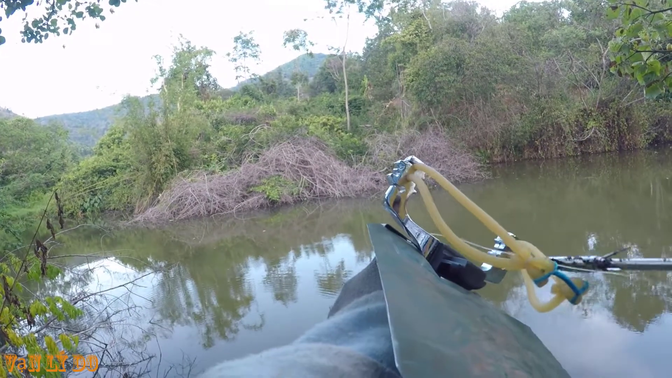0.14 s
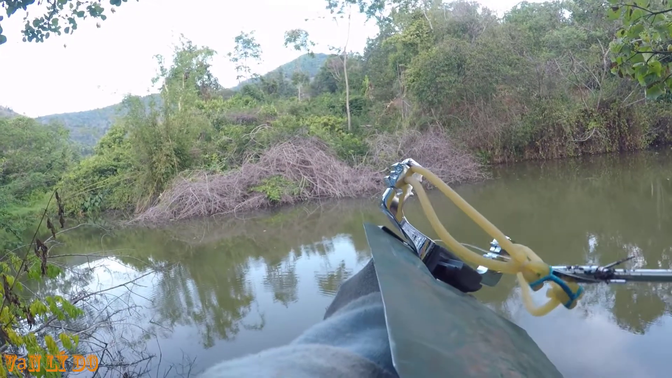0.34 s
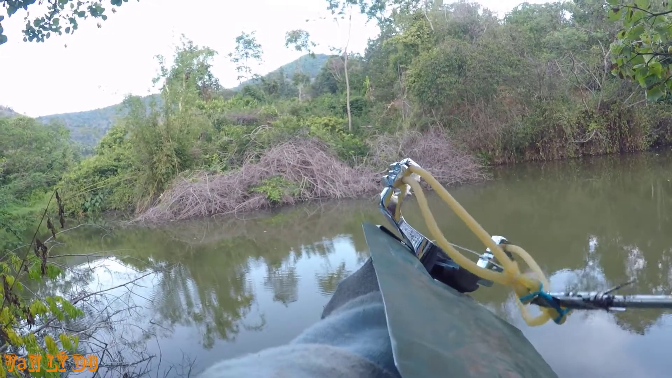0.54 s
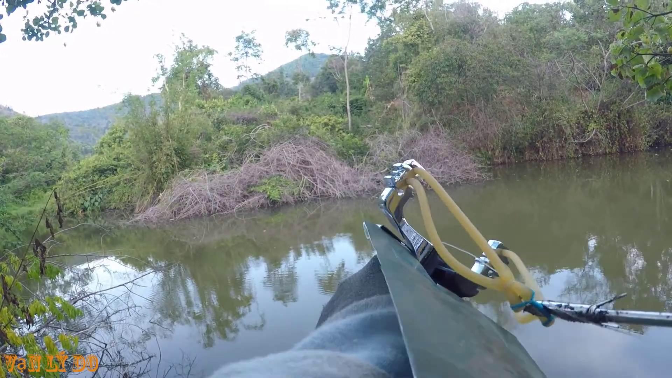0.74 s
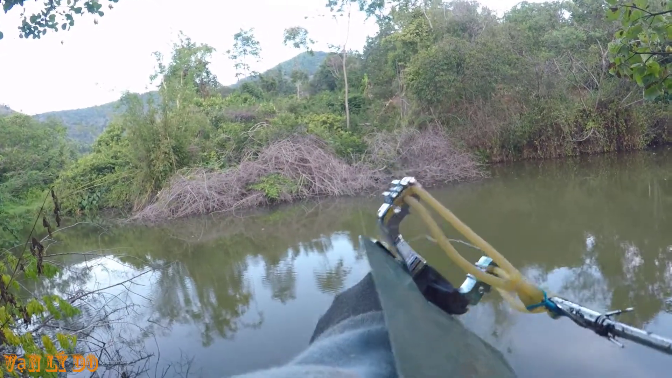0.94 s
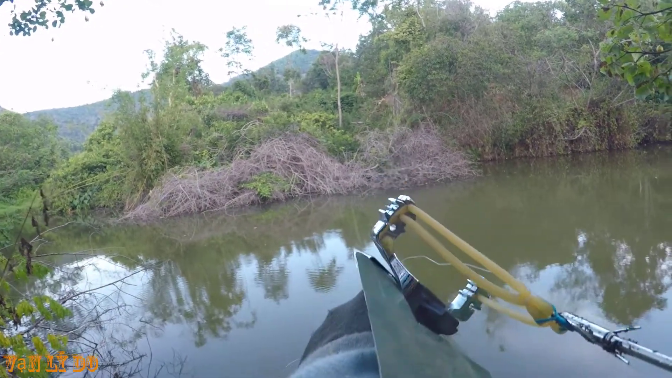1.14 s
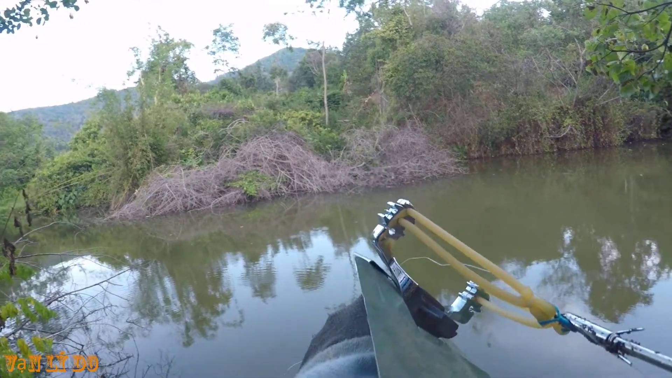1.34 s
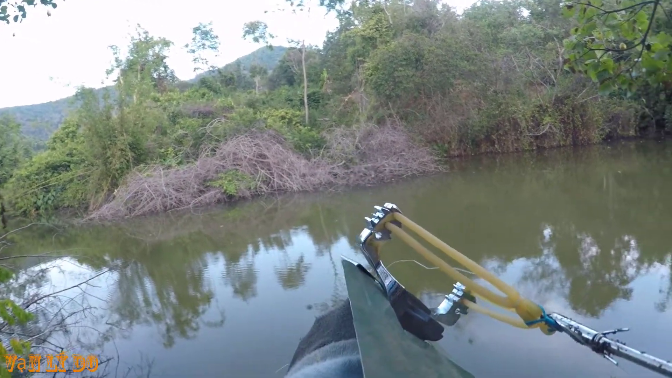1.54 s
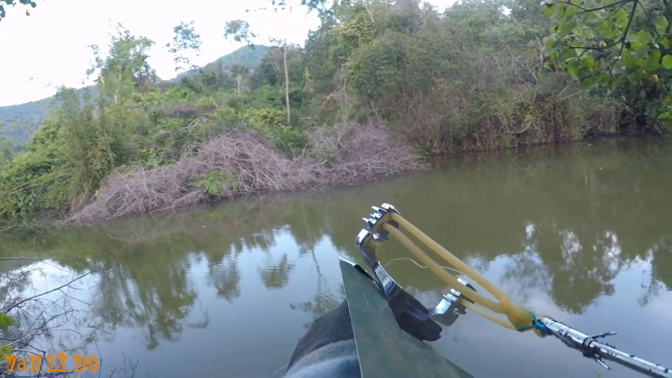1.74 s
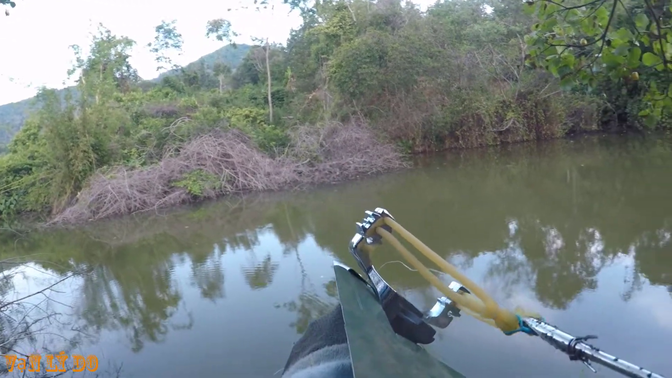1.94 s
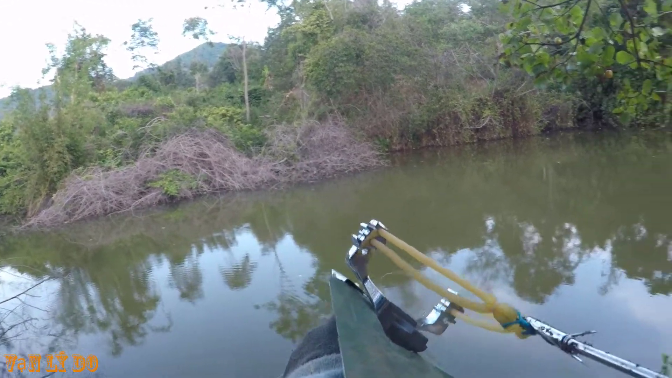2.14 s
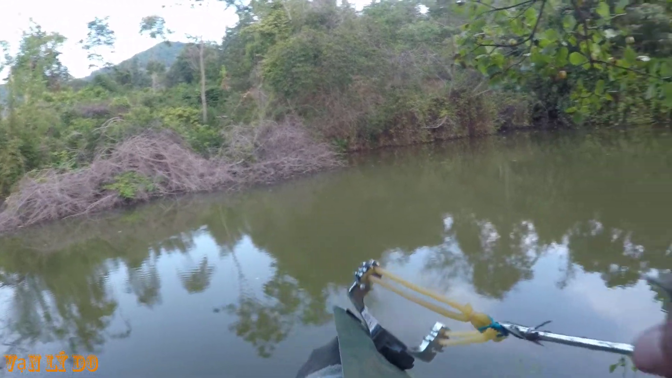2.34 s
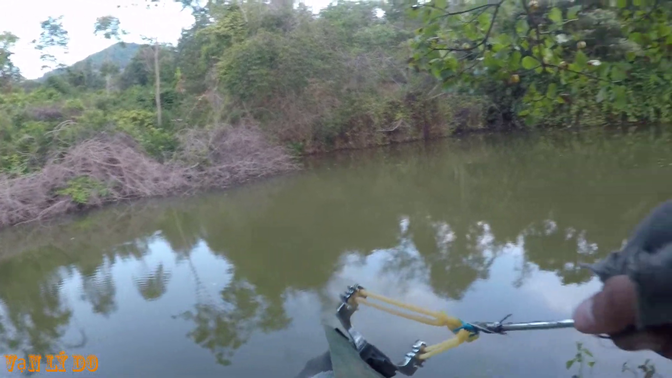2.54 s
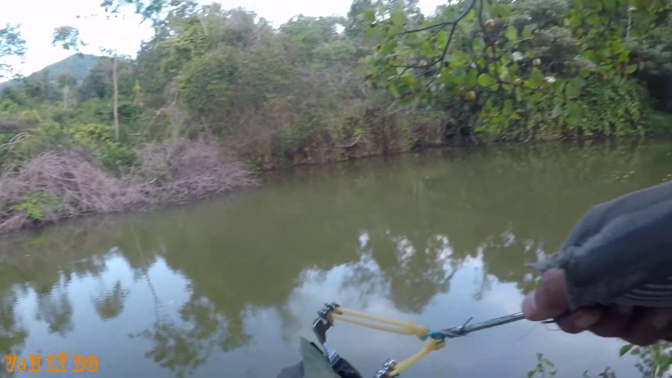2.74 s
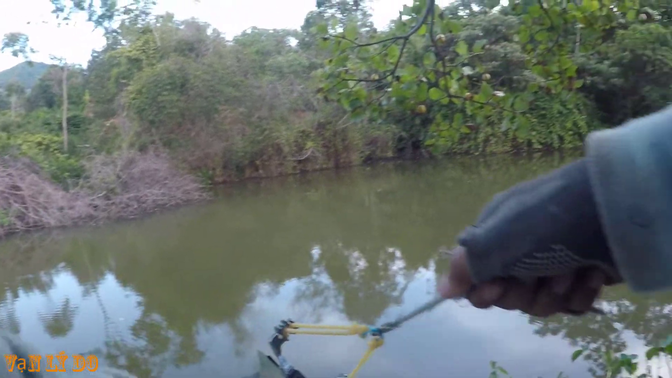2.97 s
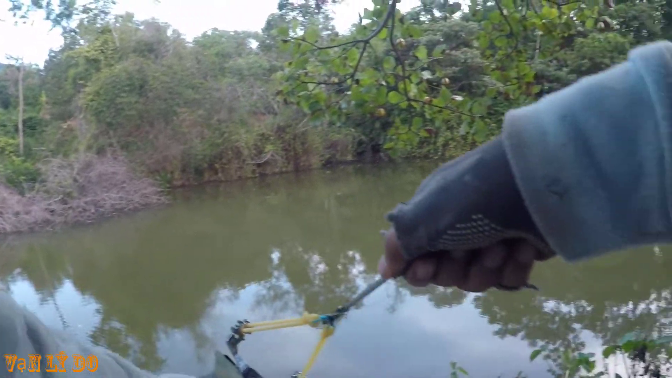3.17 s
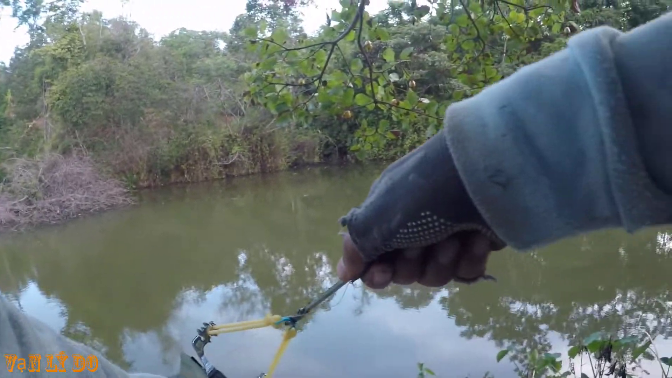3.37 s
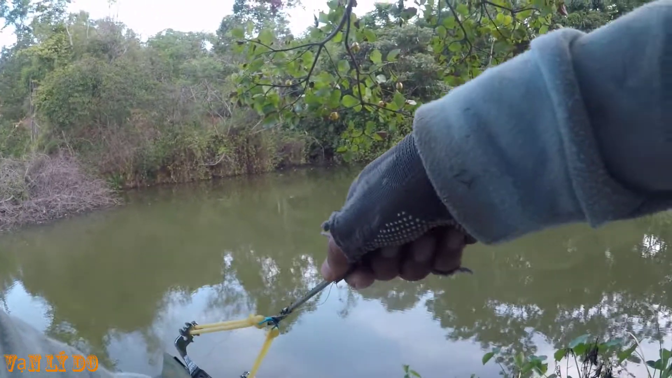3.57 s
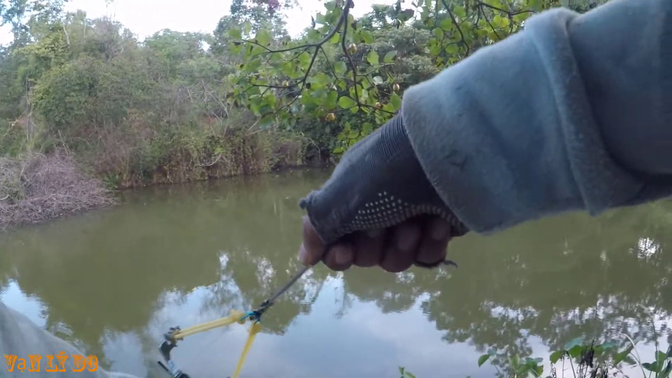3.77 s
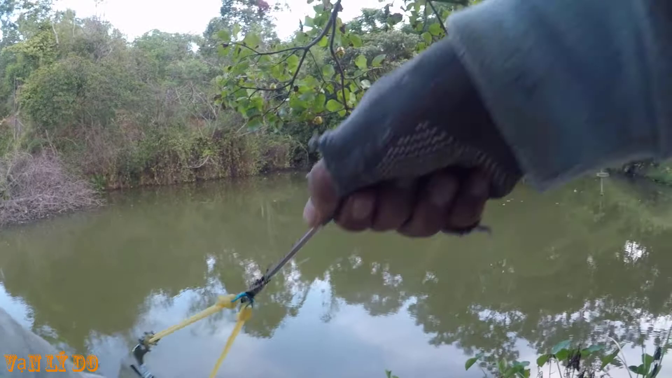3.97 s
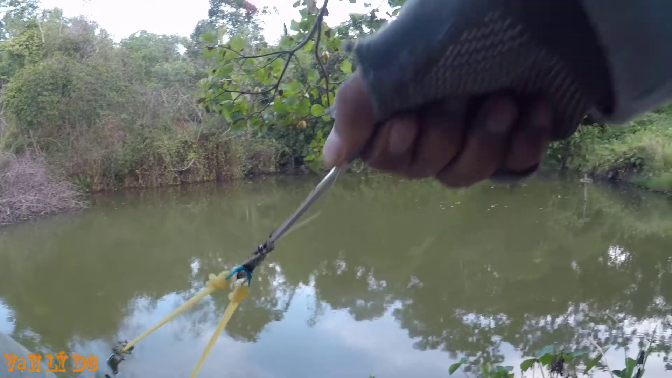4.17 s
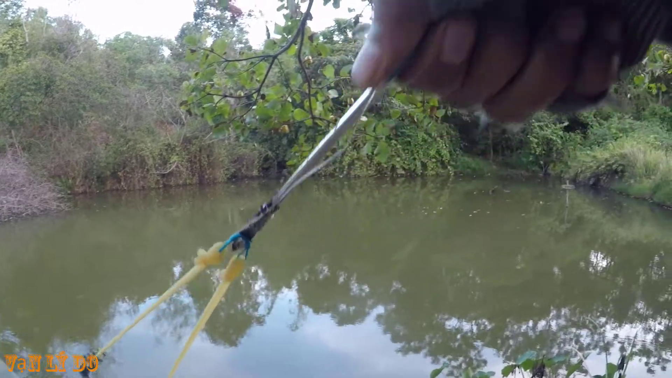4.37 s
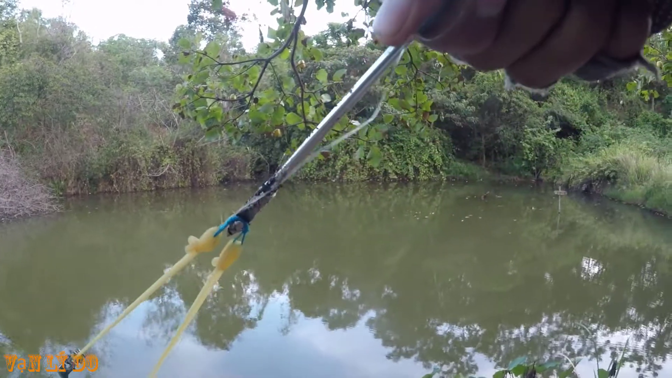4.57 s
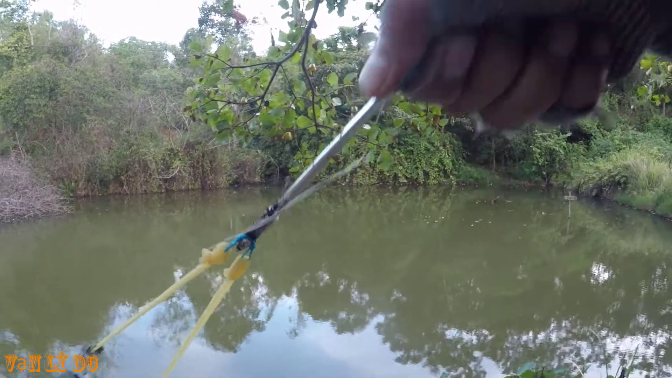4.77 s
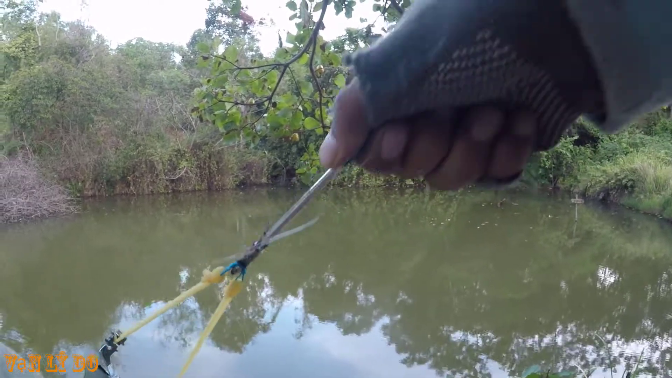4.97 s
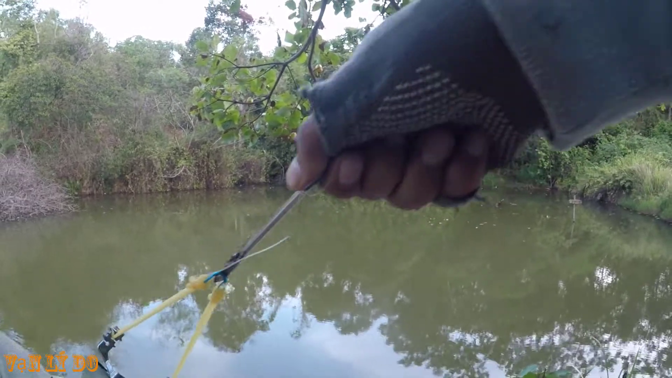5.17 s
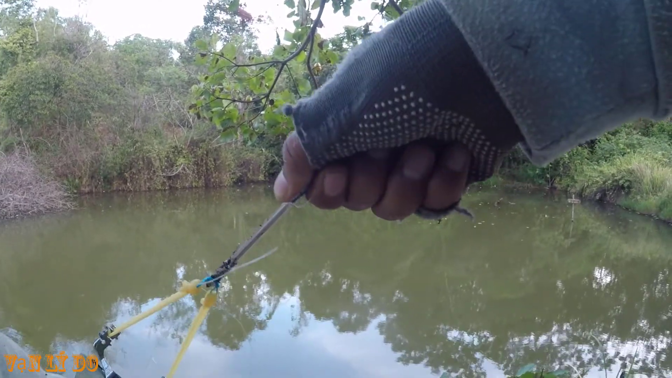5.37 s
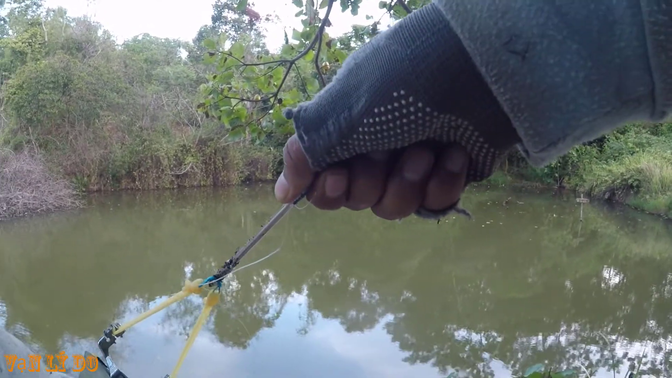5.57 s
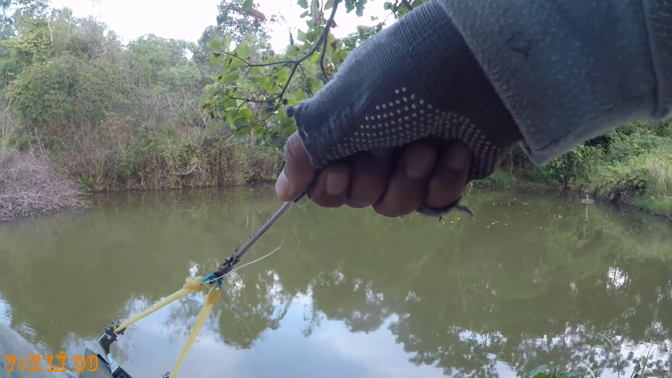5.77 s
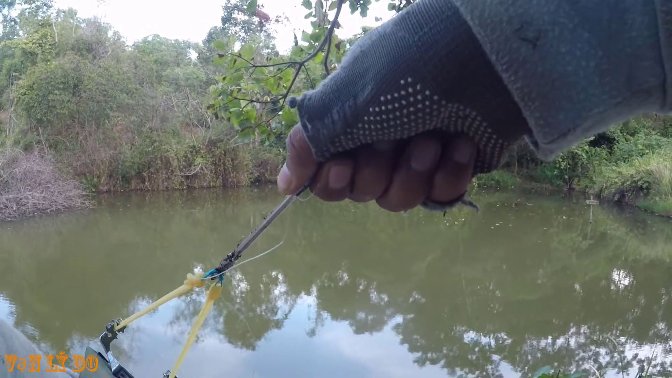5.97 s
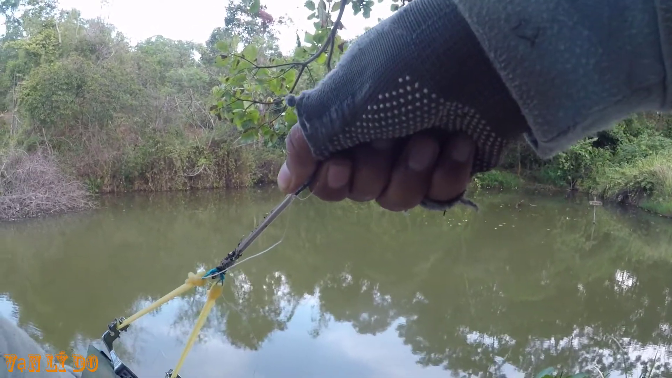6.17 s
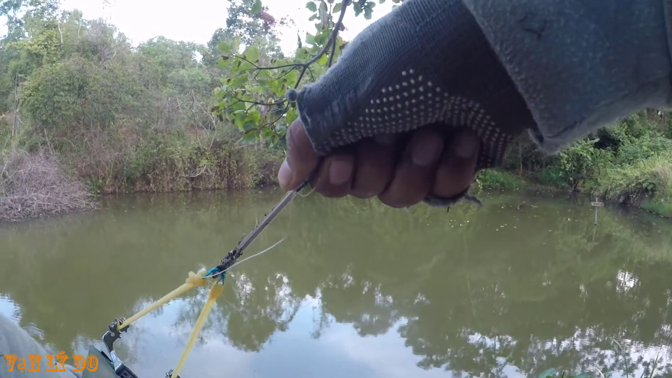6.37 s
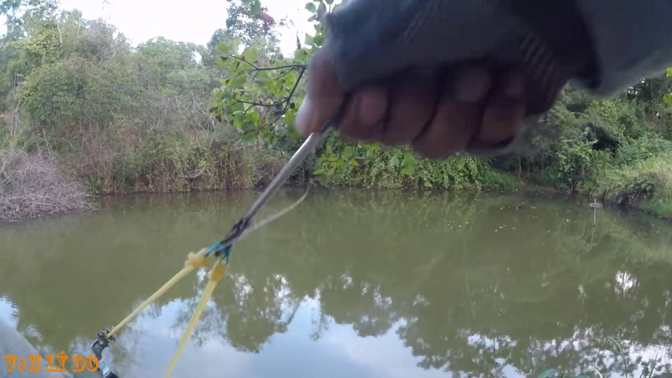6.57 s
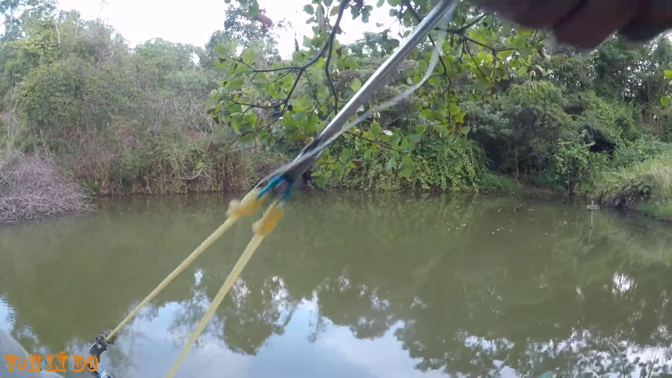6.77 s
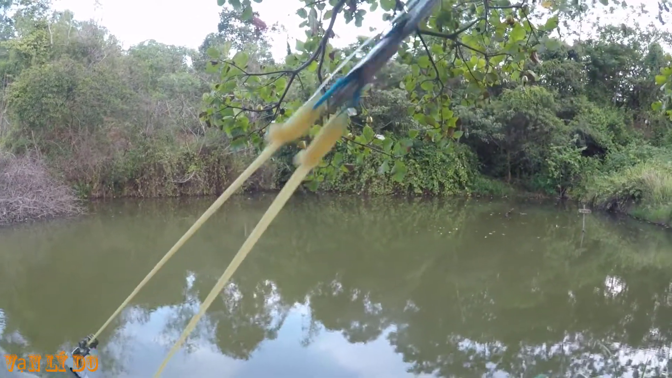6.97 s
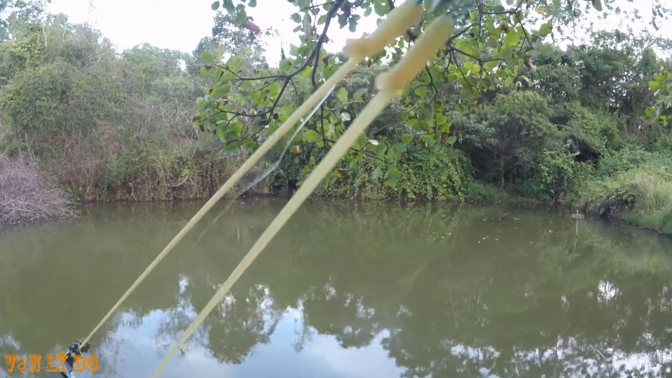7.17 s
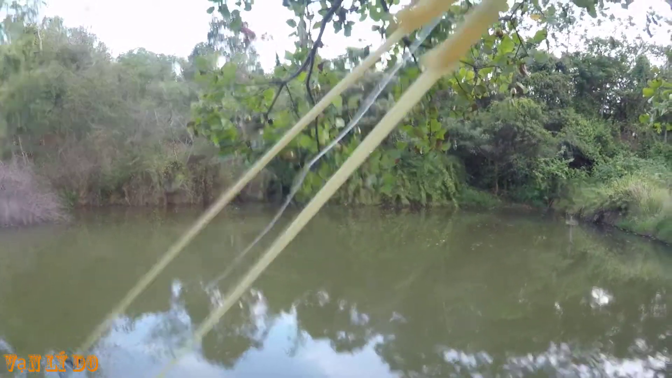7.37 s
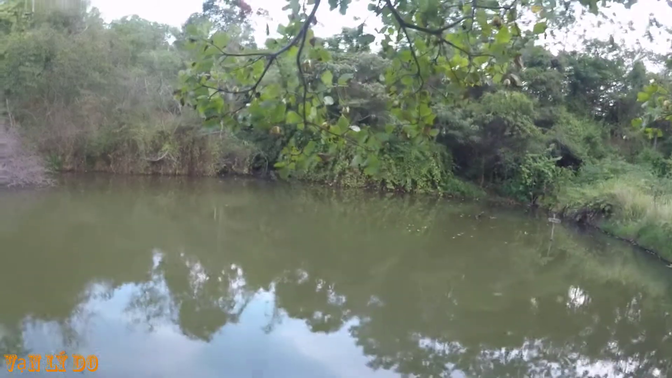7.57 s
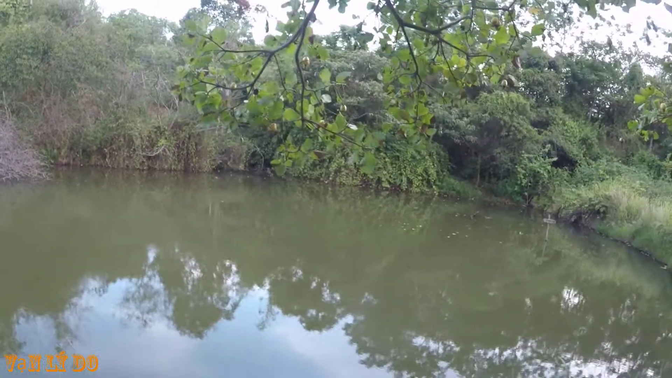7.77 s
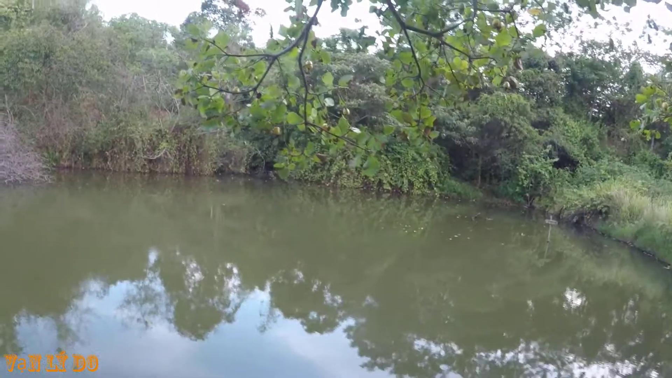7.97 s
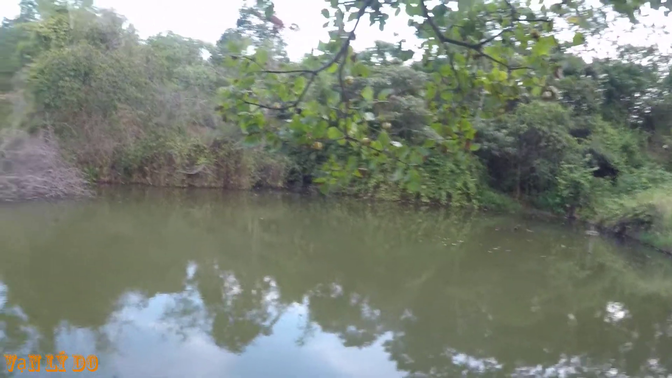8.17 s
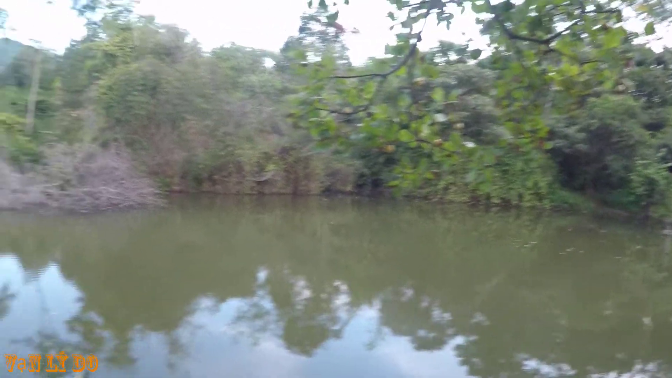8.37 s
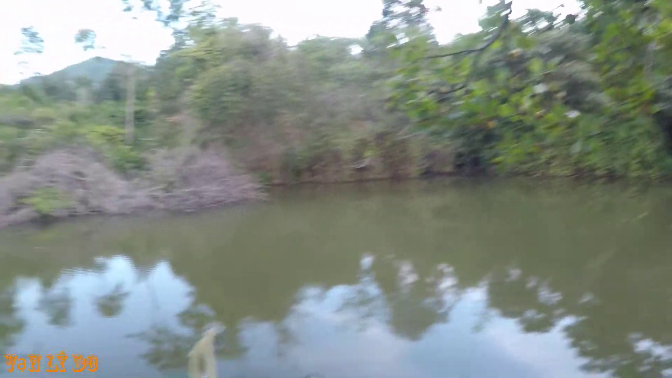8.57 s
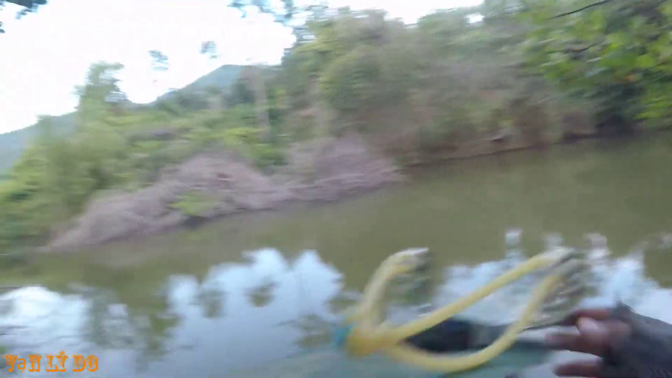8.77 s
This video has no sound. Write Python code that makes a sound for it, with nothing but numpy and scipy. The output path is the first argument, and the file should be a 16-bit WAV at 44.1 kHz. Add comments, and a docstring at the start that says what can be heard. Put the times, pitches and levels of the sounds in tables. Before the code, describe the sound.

Steady outdoor rush and insects around a few faint handling bumps, until a fishing slingshot cracks sharply, its line whirring out, followed by sleeve rustle.

```python
"""By a pond, a fishing slingshot is drawn and shot, heard from a camera worn on the body.
Behind it lie a rush of coloured noise, gusting wind, and insects shrilling near 5 kHz as wavering sines.
The dart zips free as a flash of thin noise; the bands slap the metal frame, struck as ringing modes.
The line rattles out in noise grains through that frame, while the slack bands knock back and fan the air.
Short rings, low dying sines and sleeve rubs fill in close by; the loud shot overloads the input."""
import sys
import numpy as np
from scipy import signal
from scipy.fft import rfft, irfft, next_fast_len
from scipy.io import wavfile

SR = 44100
rng = np.random.default_rng(int(sys.argv[2]) if len(sys.argv) > 2 else 0)


def wrap_up_sound(samples):
    """Save the sound to the file named by the first command line argument, as 16-bit audio."""
    columns = np.atleast_2d(samples).T
    # keep every value between -1 and 1, then stretch to whole-number steps
    tamed = np.clip(columns, -1, 1)
    steps = np.round(tamed * 32767).astype(np.int16)
    wavfile.write(sys.argv[1], SR, steps)


N = 388521
TIME = np.arange(N) / SR  # s

# colour of the outdoor rush: (frequency [Hz], density [dB per Hz])
RUSH_COLOUR = [(76, -68), (130, -6), (162, 1.5), (299, -6.5), (536, -14), (628, -14), (668, -16.5),
               (1450, -21.5), (2360, -27), (3600, -36.5), (4640, -30.5), (5100, -29.5), (5600, -47),
               (7280, -79), (12300, -120)]
# colour of far insects and hiss: (frequency [Hz], density [dB per Hz])
HISS_COLOUR = [(4500, -24), (5600, -2), (6700, 2), (7800, -2.5), (8800, 1), (10200, -0.5), (11200, -7),
               (12000, -11), (15500, -21)]
# loudness of that hiss: (time [s], level [dB])
HISS_LEVEL = [(0, -39.5), (2, -38.5), (4.6, -37), (5.4, -37.5), (7, -36), (7.8, -37), (8.8, -38.5)]
# thin hiss at the very top: (frequency [Hz], density [dB per Hz])
AIR_COLOUR = [(10900, -14), (11700, -4.5), (12300, -2.5), (12900, -3), (14200, -8.5), (15300, -14)]
# colour of wind on the microphone: (frequency [Hz], density [dB per Hz])
WIND_COLOUR = [(12, 2), (35, -0.5), (70, -2.5), (120, -9), (250, -19), (500, -26), (1200, -40.5)]
# strength of the wind before its trim, nearly still while aiming: (time [s], level [dB])
WIND_LEVEL = [(0, -27), (0.55, -30.5), (0.9, -24.5), (2.15, -34), (2.6, -28), (3.2, -29.5), (3.8, -22.5),
              (4.4, -23), (5.7, -33.5), (6.3, -39.5), (6.95, -48), (7.35, -21.5), (8.15, -18.5),
              (8.7, -15.5), (8.8, -15.5)]
# insect chorus before its trim, fainter as the wearer turns away: (time [s], level [dB], centre [Hz])
CHORUS = [(0, -31.5, 5070), (0.4, -31.5, 5160), (0.9, -32, 5100), (1.35, -31.5, 5160), (1.9, -37.0, 5054),
          (2.6, -39, 5126), (3.2, -43.5, 5095), (4.3, -43, 5040), (7.1, -44.6, 5100), (8.05, -41, 5090),
          (8.55, -37.7, 5050)]
# calls of two nearer insects taking turns: (start [s], level [dB])
RISING_CALLS = [(0.249, -47), (1.25, -45), (1.97, -41), (3.1, -42.5), (4.15, -42.5), (5.17, -41.5),
                (6.199, -48), (7.101, -52), (8.4, -45)]
# small ticks of the gear, and the bright ring of the slap at 7.62 s:
# (time [s], level [dB], pitch [Hz], t60 [s])
SHORT_RINGS = [(2.396, -19, 1880, .005), (2.935, -16, 2200, .004), (2.936, -17, 4700, .003),
               (2.987, -22, 2200, .005), (7.624, -7, 5400, .03), (7.81, -25, 4580, .008),
               (8.079, -16, 7500, 0.0054), (8.361, -24, 4400, 0.0087)]
# bumps on the camera housing, and a low puff of air at 8.48 s: (time [s], level [dB], pitch [Hz])
BUMPS_AND_PUFF = [(.746, -4.5, 259), (1.238, -3.5, 253), (2.177, -1.5, 178), (3.388, -13, 297),
                  (3.969, -4.5, 180), (7.372, -10, 180), (7.504, 8, 190), (7.505, 1, 410), (7.57, -3, 200),
                  (7.682, 0.5, 200), (8.396, -5, 161), (8.476, 1, 85.5), (8.484, 7, 215), (8.486, 4, 350),
                  (8.721, -3, 108)]
# colour of the rubbing sleeve: (frequency [Hz], density [dB per Hz])
CLOTH_COLOUR = [(250, 5), (800, 4), (1300, -2), (1900, 3), (3000, -10), (4300, -1), (5800, -5), (7500, -16),
                (14000, -20)]
# rubs as the arm comes down: (peak time [s], peak level [dB], rise and fade time constant [s])
RUBS = [(8.405, -29.5, 0.014), (8.485, -20.5, 0.0085), (8.639, -26, 0.011), (8.668, -22.5, 0.013),
        (8.718, -26.5, .018)]
# ringing modes of the slingshot frame: (frequency [Hz], level [dB], t60 [s])
FRAME_MODES = [(395, -6.5, 0.015), (810, -5.5, 0.03), (900, -2.5, 0.03), (1190, -13, 0.023),
               (1940, -13, 0.019), (2080, -8, 0.019), (2610, -9.5, 0.014), (4030, -12.5, 0.031),
               (4260, -8.5, 0.026), (4590, -5.5, 0.0094), (5266, -7.5, 0.029), (5500, -8.5, 0.021),
               (5830, -7, 0.02), (6100, -12, 0.011)]
# blows on the frame: (time [s], level [dB], bass share [dB], crack share [dB])
BLOWS = [(7.389, -8, -3, 1), (7.409, 7.5, -3, -16), (7.414, -4, 10, -12), (7.438, 8.5, -2, -4),
         (7.461, 2.5, -11, -5), (7.502, -9, 2, 1), (7.578, -20, 6, -12), (7.624, -12, 10, -19),
         (7.69, -16.5, 0, -4), (8.483, -21, 9, -6), (8.776, -15, 9.5, -6)]

RUSH_DB, WIND_DB, CHORUS_DB = -26.5, 2.5, 0.5
# each bump or puff falls 60 dB within this many cycles
BUMP_CYCLES = 10
# the moment the bands are let go, and the moment they are spent (s)
SHOT_S, SPENT_S = 7.39, 7.505
# the line runs off the reel until the bands are spent, then its slack loops trail out
LINE_DB, LINE_RISE_S, LINE_T60_S = -9.5, 0.015, 0.12
TRAIL_DB, TRAIL_RISE_S, TRAIL_T60_S = -25.5, 0.1, 0.42
# the loose bands swing to and fro; pressure is a linear gain, turbulence is relative to the swing
SWING_HZ, SWING_T60_S = 13.9, 1.34
SWING_PRESSURE, SWING_TURBULENCE = 0.82, 0.41
# harder blows chatter longer: time constant at 0 dB (s), and the rise in level that doubles it (dB)
CHATTER_S, CHATTER_DOUBLING_DB = 0.0051, 14.5
CUTOFF_HZ = 15400


def from_db(db):
    """Decibels to gain."""
    return 10 ** (np.asarray(db) / 20)


def rms_one(x):
    """Scale to unit power."""
    return x / np.sqrt(np.mean(x ** 2) + 1e-20)


def level(rows):
    """Gain over time from (time [s], level [dB]) rows."""
    return from_db(np.interp(TIME, *np.transpose(rows)))


def envelope(start, rise, end, t60):
    """Gain that rises from the start, holds until the end and dies away."""
    attack = np.clip((TIME - start) / rise, 0, 1)
    return attack * from_db(-60 * np.maximum(TIME - end, 0) / t60)


def butter(x, hz, kind, order=2):
    """Causal Butterworth filter."""
    corner = np.clip(hz, 10, 0.45 * SR)
    sections = signal.butter(order, corner, kind, fs=SR, output="sos")
    return signal.sosfilt(sections, x + 1e-18)


def noise(spectrum):
    """Noise coloured by (frequency [Hz], density [dB]) points, shut off beyond them; rms 1."""
    hz, db = np.transpose(spectrum)
    size = next_fast_len(N)
    bins = np.maximum(np.arange(size // 2 + 1) * SR / size, 1)
    gain = from_db(np.interp(np.log(bins), np.log(hz), db, left=-90, right=-90))
    white = rng.standard_normal(size)
    return rms_one(irfft(rfft(white) * gain, size)[:N])


def drift(hz):
    """Smooth random wandering up to about the given rate; rms 1."""
    knots = rng.standard_normal(int(2 * hz * N / SR) + 4)
    return rms_one(np.interp(2 * hz * TIME, np.arange(len(knots)), knots))


def ring(drive, hz, t60):
    """Two-pole resonance: a unit click sets a dying sine of starting height 1 ringing."""
    radius = from_db(-60 / (t60 * SR))
    angle = 2 * np.pi * hz / SR
    feedback = [1, -2 * radius * np.cos(angle), radius * radius]
    return signal.lfilter([0, np.sin(angle)], feedback, drive + 1e-18)


def burst(s, length):
    """A dying spray of tiny contacts, as spiky noise with unit energy."""
    out = np.zeros(N)
    age = np.arange(SR // 8) / SR
    chance = rng.standard_normal(len(age))
    spray = chance * np.abs(chance) * np.exp(-age / length)  # signed squares make it spiky
    start = int(s * SR)
    out[start:start + len(age)] = (spray / np.linalg.norm(spray))[:N - start]
    return out


def rush():
    """Far outdoor rush: broadband noise whose level wavers slightly."""
    return from_db(RUSH_DB) * noise(RUSH_COLOUR) * from_db(0.6 * drift(13.6))


def hiss():
    """Far insects blur into a band of treble noise."""
    return level(HISS_LEVEL) * noise(HISS_COLOUR)


def air():
    """Thin top hiss, drawn separately for each ear."""
    return np.array([noise(AIR_COLOUR), noise(AIR_COLOUR)]) * from_db([[-47.5], [-48]])


def wind():
    """Wind presses on the microphone as mostly low noise that gusts and drops."""
    return from_db(WIND_DB) * level(WIND_LEVEL) * noise(WIND_COLOUR)


def shrill(hz, spread_hz, wander_hz=20, flutter=0.43, count=5):
    """A few close, wavering and fluttering sines around a pitch, the outer ones weaker; rms 1."""
    out = 0
    for place in np.linspace(-1, 1, count):
        pitch = hz + place * spread_hz + wander_hz * drift(9)
        tone = np.sin(2 * np.pi * (np.cumsum(pitch) / SR + rng.random()))
        out = out + tone * (1 + flutter * drift(55)) * from_db(-5 * place ** 2)
    return rms_one(out)


def insect_chorus():
    """Many insects shrill together, as a cluster of sines around a shifting centre."""
    s, db, hz = np.transpose(CHORUS)
    loudness = from_db(CHORUS_DB + np.interp(TIME, s, db))
    return loudness * shrill(np.interp(TIME, s, hz), spread_hz=105, count=7)


def insect_callers(start_hz=4850, slide_hz_per_s=270, swell_s=0.1, fade_s=1.0):
    """Two nearer insects call by turns, each call a narrow cluster gliding upward."""
    out = np.zeros(N)
    for turn in range(2):
        starts, db = np.transpose(RISING_CALLS[turn::2])
        call = np.maximum(np.searchsorted(starts, TIME) - 1, 0)  # this caller's latest call
        age = np.maximum(TIME - starts[call], 0)
        swell = np.minimum(age / swell_s, 1)
        loudness = from_db(db[call]) * swell * np.exp(-(age / fade_s) ** 4)
        out += loudness * shrill(start_hz + slide_hz_per_s * age, spread_hz=75, count=5)
    return out


def ticks_and_slap_ring():
    """Gear ticks, and the bright ring of one slap: a tiny burst rings one resonance each."""
    out = np.zeros(N)
    for s, db, hz, t60 in SHORT_RINGS:
        out += from_db(db) * ring(burst(s, 0.00054), hz, t60)
    return out


def bumps_and_puff(bump_rise_s=0.002):
    """Bumps on the housing, and one low puff of air, as soft, quickly dying sines."""
    out = np.zeros(N)
    for s, db, hz in BUMPS_AND_PUFF:
        on = slice(int(s * SR), int(s * SR) + SR // 4)
        age = TIME[on] - TIME[on][0]
        fade = from_db(db - 60 * age * hz / BUMP_CYCLES)
        out[on] += fade * (1 - np.exp(-age / bump_rise_s)) * np.sin(2 * np.pi * hz * age)
    return out


def sleeve(grain_db=1.5, catches_hz=300):
    """Cloth slides close to the microphone, catching and slipping as grainy noise."""
    rubbing = sum(from_db(db) * np.exp(-np.abs(TIME - s) / fade) for s, db, fade in RUBS)
    return rubbing * noise(CLOTH_COLOUR) * from_db(grain_db * drift(catches_hz))


def recoil(rise_s=0.01, eddy_hz=65):
    """The swinging bands push air on the microphone, in eddies, less on every swing."""
    swing = np.sin(2 * np.pi * SWING_HZ * (TIME - SHOT_S))
    gusts = swing + SWING_TURBULENCE * drift(eddy_hz)
    return SWING_PRESSURE * envelope(SHOT_S, rise_s, SHOT_S, SWING_T60_S) * gusts


def line(grain_db=1.8, bass_db=-3, coils_per_s=105, coil_db=3, damped_t60=0.011):
    """Coil after coil flicks off the reel, in uneven grains that stir the frame and damp it."""
    coil_rate = coils_per_s * (1 + 0.096 * drift(30))
    coils = np.cos(2 * np.pi * np.cumsum(coil_rate) / SR)
    grains = from_db(grain_db * drift(300) + coil_db * coils)
    body = 0
    for hz, db, _ in FRAME_MODES:
        # the line wanders over the frame, so its colour keeps shifting
        scrape = rng.standard_normal(N) * grains * from_db(2.5 * drift(40))
        mode_db = db + bass_db * (hz < 1500)
        body = body + from_db(mode_db) * ring(scrape, hz, damped_t60)
    swish = butter(rng.standard_normal(N) * grains, 6500, "low")
    running = from_db(LINE_DB) * envelope(SHOT_S, LINE_RISE_S, SPENT_S, LINE_T60_S)
    trailing = from_db(TRAIL_DB) * envelope(SPENT_S, TRAIL_RISE_S, SPENT_S + TRAIL_RISE_S, TRAIL_T60_S)
    return (running + trailing) * (rms_one(body) + from_db(-9) * rms_one(swish))


def release(at_s=7.3926, rise_s=0.0024, fall_s=0.0042, zip_db=-6.5, far_ear_db=-9):
    """The dart slips out of the grip with a very short, thin zip, weaker in the second ear."""
    age = TIME - at_s
    swell = np.exp(-np.minimum(np.maximum(-age / rise_s, age / fall_s), 20))
    thin = noise([(7000, -15), (12500, 2), (15000, -1), (16000, -9)])  # (Hz, dB per Hz)
    return from_db(zip_db) * swell * thin * from_db([[0], [far_ear_db]])


def blows(bass_edge_hz=1500, crack_edge_hz=1200, scatter_db=1.0):
    """Bands and pouch slap the frame: a push rings its low modes, chatter cracks and rings the high ones."""
    out = np.zeros(N)
    for s, db, bass_db, crack_db in BLOWS:
        on = slice(int(s * SR), int(s * SR) + SR // 5)
        chatter = burst(s, CHATTER_S * 2 ** (db / CHATTER_DOUBLING_DB))[on]
        push = from_db(bass_db) * signal.unit_impulse(len(chatter))
        sound = from_db(11.5 + crack_db) * butter(chatter, crack_edge_hz, "high")
        for hz, mode_db, t60 in FRAME_MODES:
            # each blow lands on another spot, so it stirs the high modes differently
            drive = push if hz < bass_edge_hz else chatter * from_db(scatter_db * rng.standard_normal())
            sound += from_db(mode_db) * ring(drive, hz, t60)
        out[on] += from_db(db) * sound
    return out


def scene():
    """Layers from background to shot, all centred but the top hiss and the dart's zip."""
    background = rush() + hiss() + air() + wind() + insect_chorus() + insect_callers()
    close_details = ticks_and_slap_ring() + bumps_and_puff() + sleeve()
    shot = recoil() + line() + release() + blows()
    return background + close_details + shot


def record(dry):
    """The input overloads with a slightly rounded knee, then a steep filter cuts the top."""
    fine = signal.resample_poly(dry, 2, 1, axis=-1)  # double rate keeps aliasing down
    limited = fine / (1 + fine ** 8) ** (1 / 8)
    overloaded = signal.resample_poly(limited, 1, 2, axis=-1)
    top_cut = signal.ellip(10, 0.1, 80, CUTOFF_HZ, fs=SR, output="sos")
    return signal.sosfilt(top_cut, overloaded)


dry = scene()
out = record(dry)
wrap_up_sound(out)
```